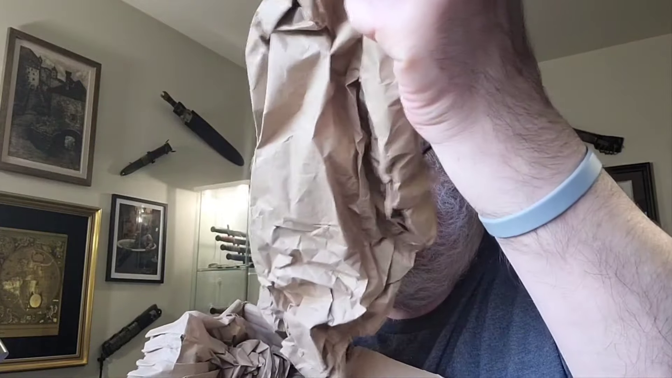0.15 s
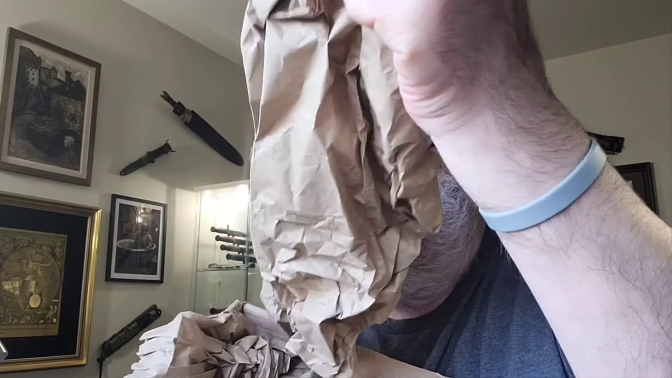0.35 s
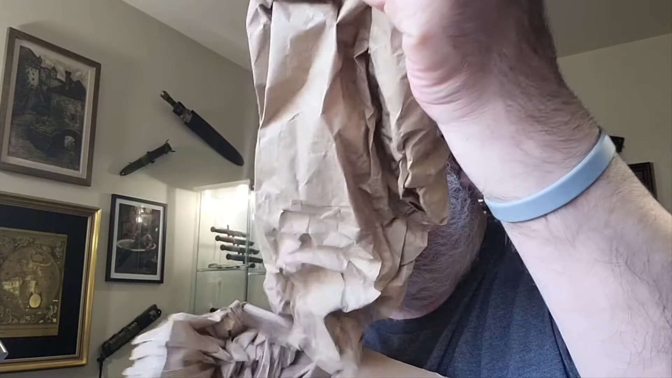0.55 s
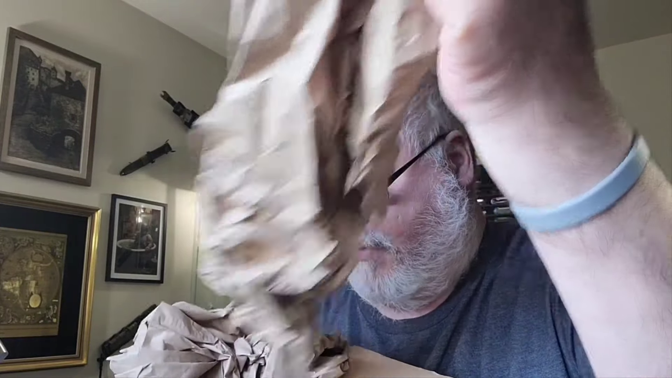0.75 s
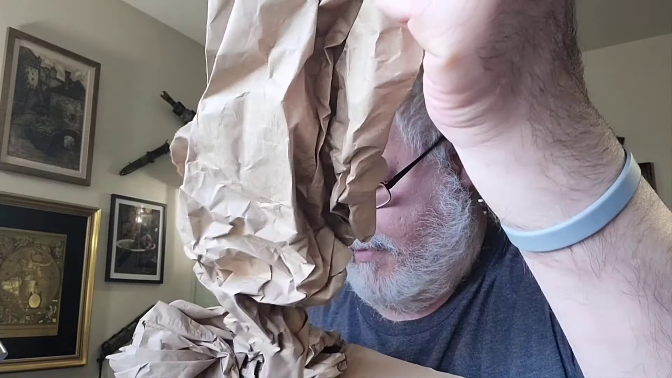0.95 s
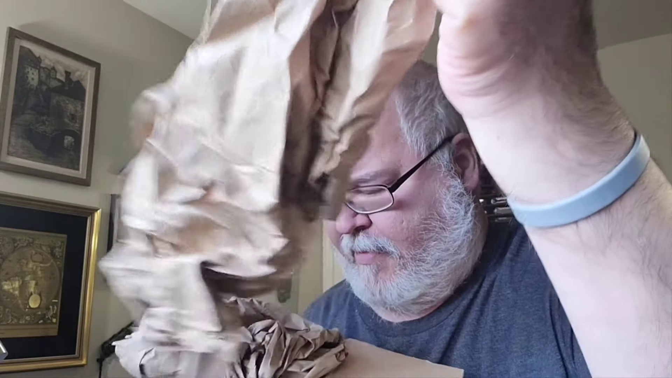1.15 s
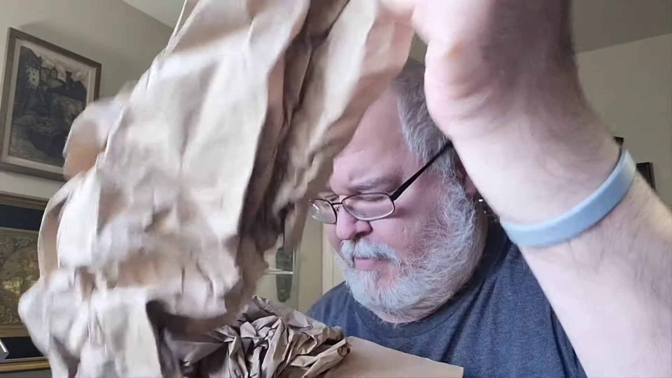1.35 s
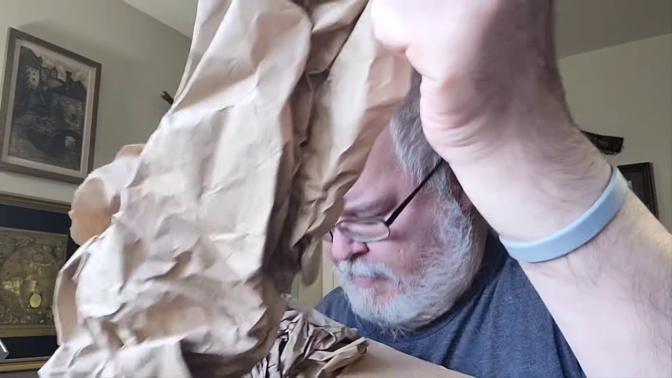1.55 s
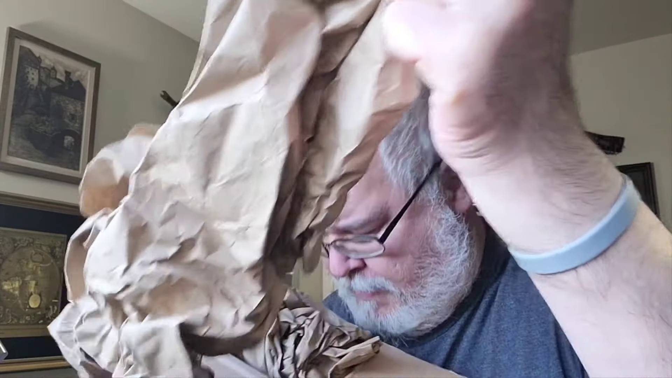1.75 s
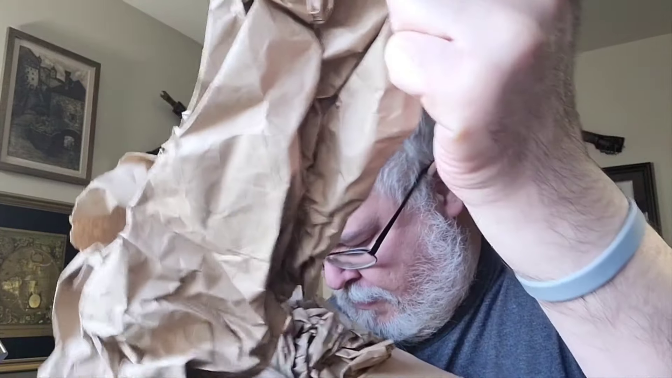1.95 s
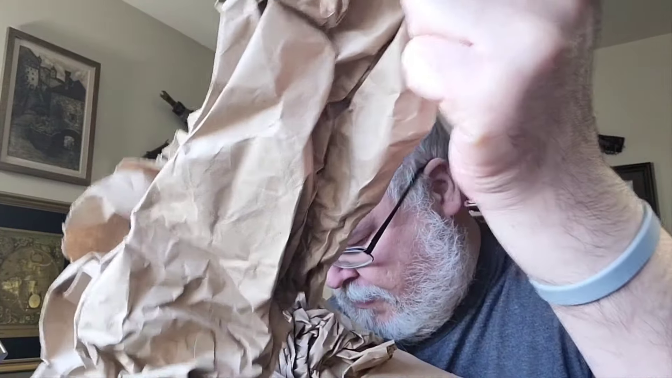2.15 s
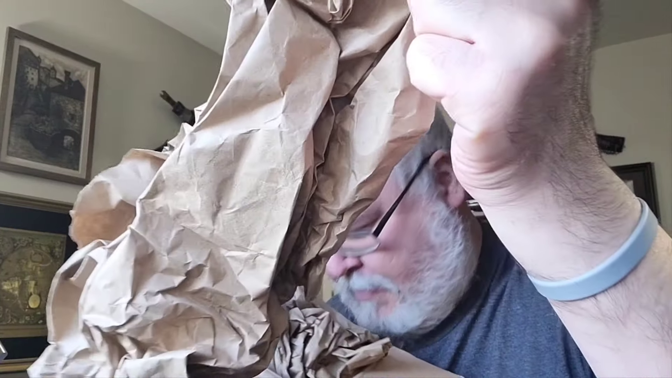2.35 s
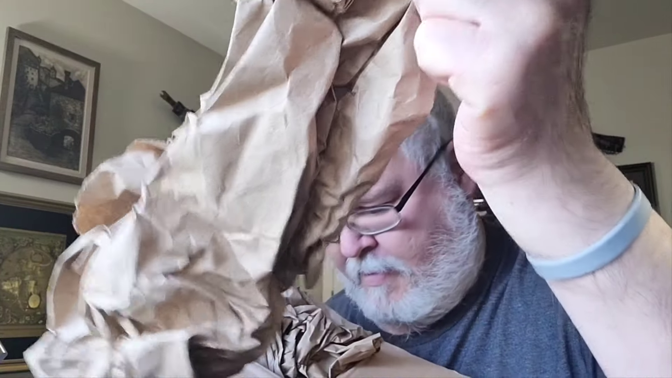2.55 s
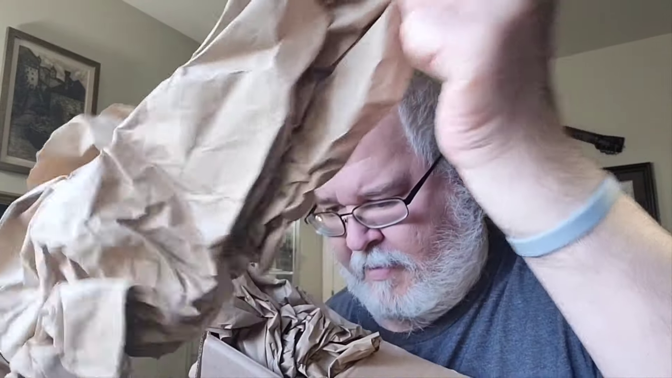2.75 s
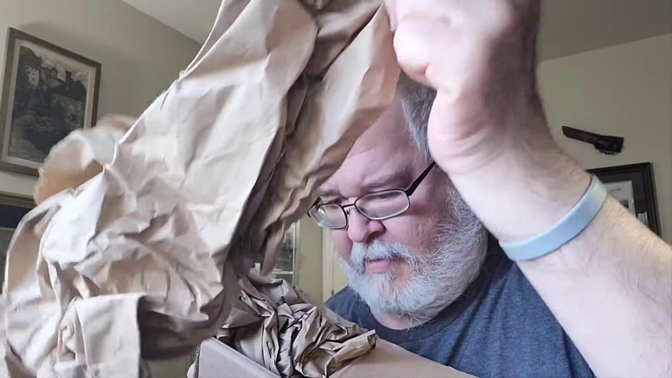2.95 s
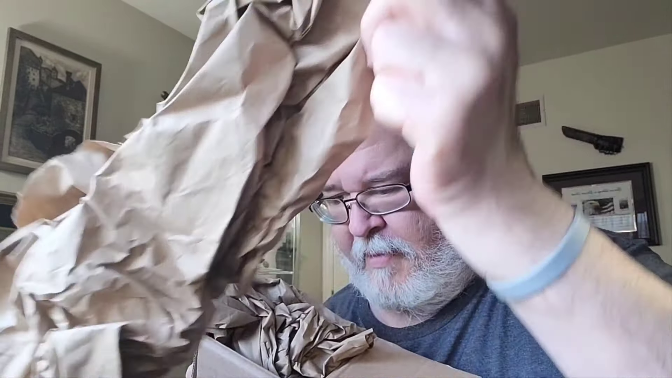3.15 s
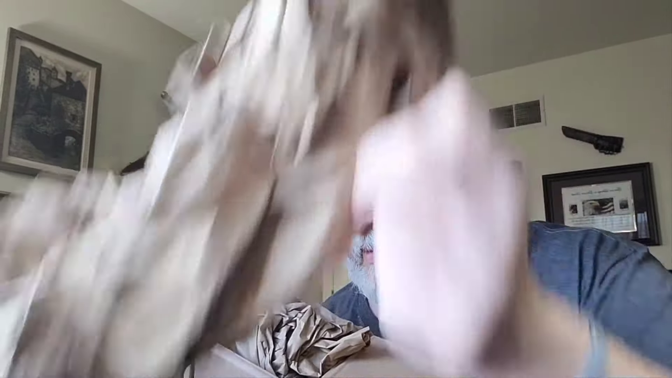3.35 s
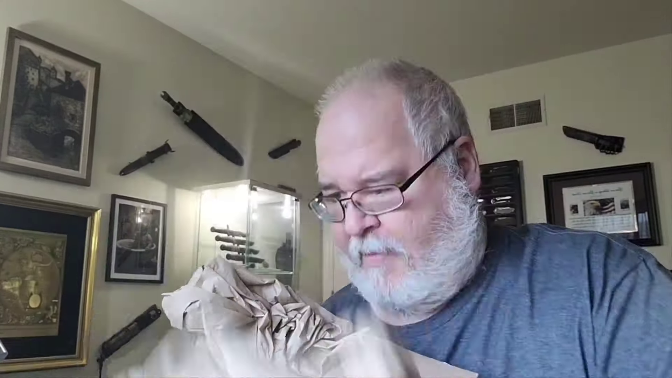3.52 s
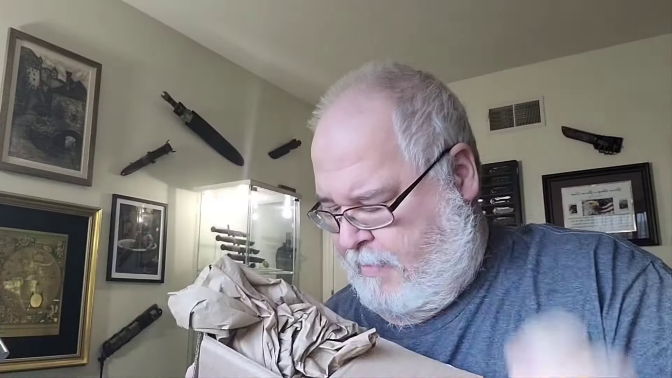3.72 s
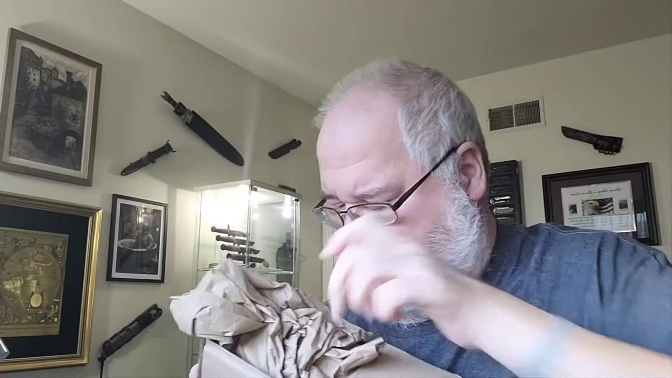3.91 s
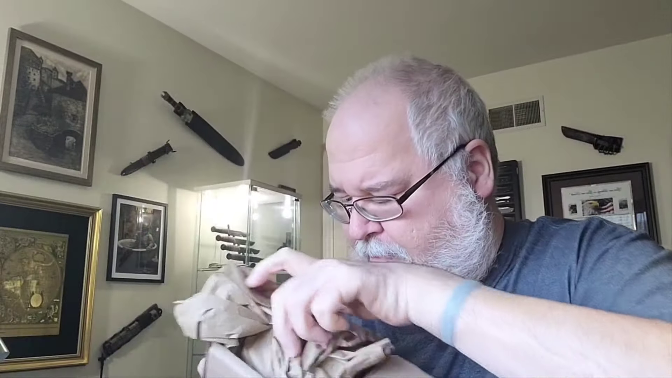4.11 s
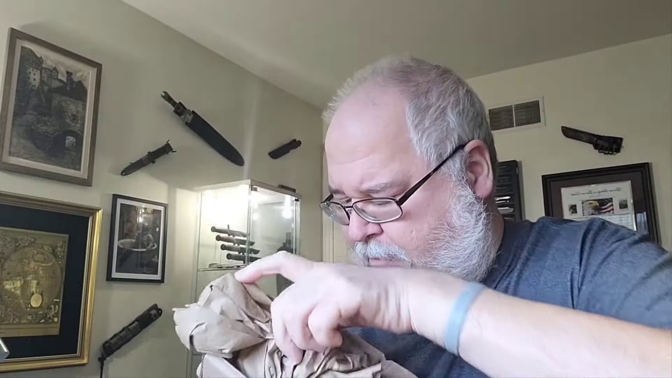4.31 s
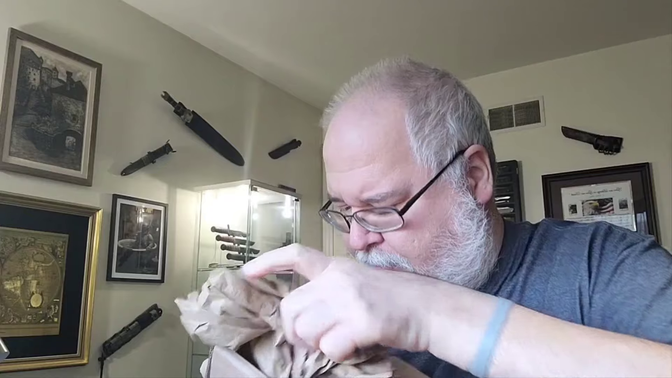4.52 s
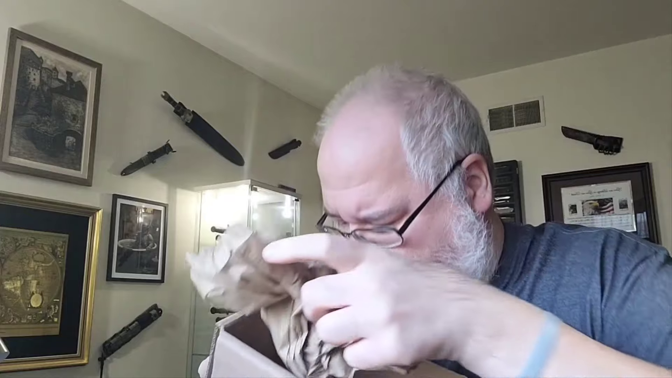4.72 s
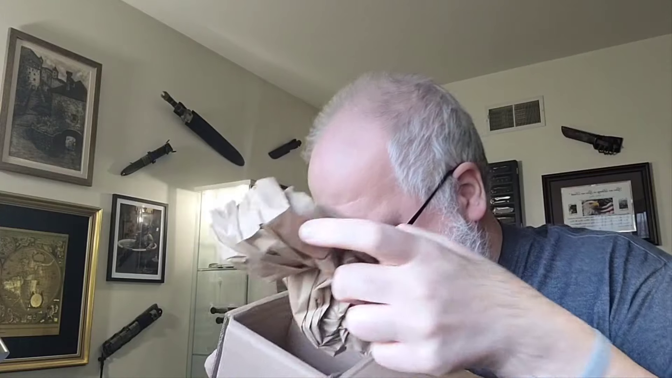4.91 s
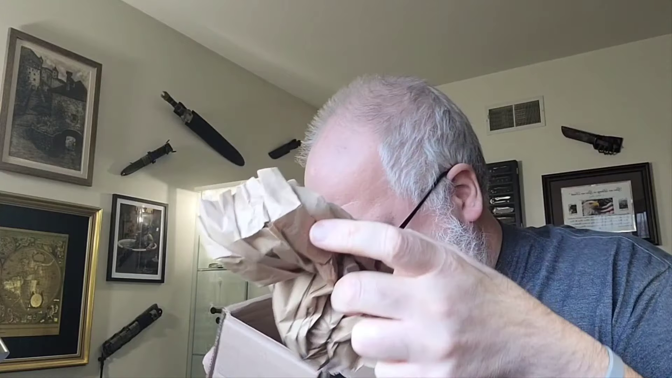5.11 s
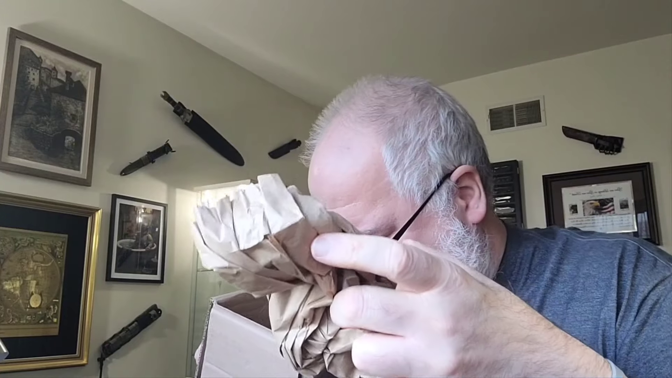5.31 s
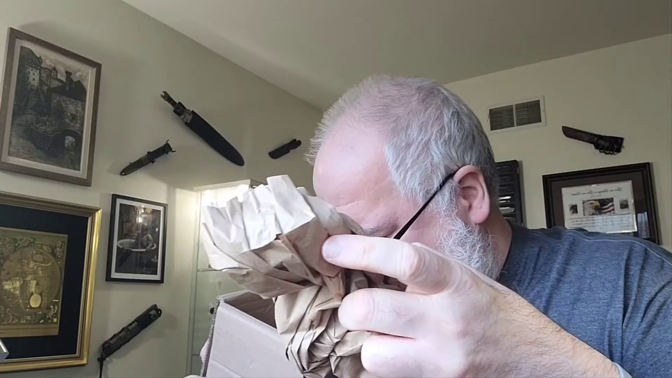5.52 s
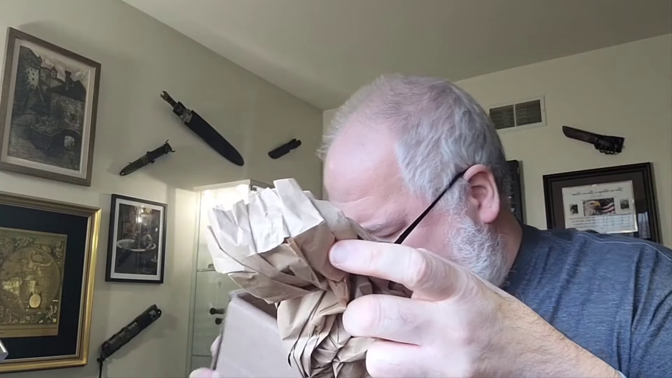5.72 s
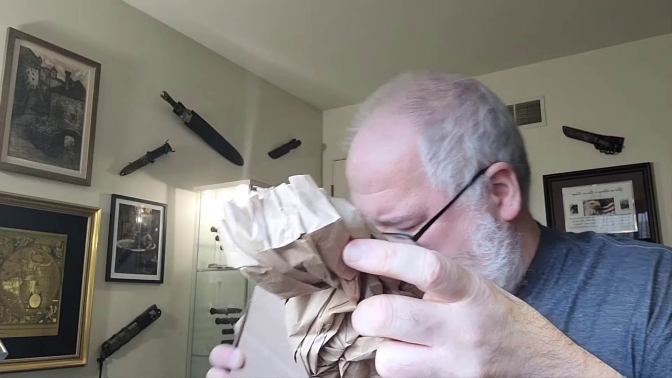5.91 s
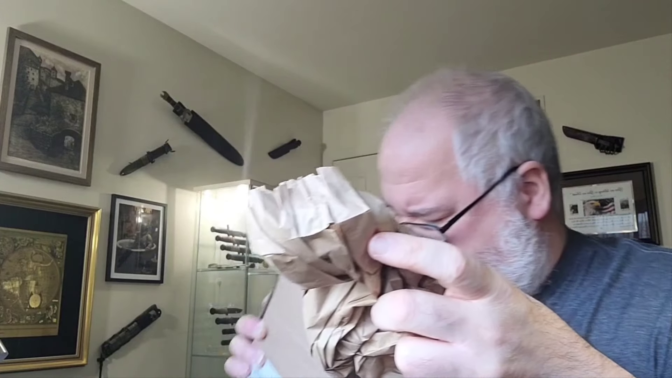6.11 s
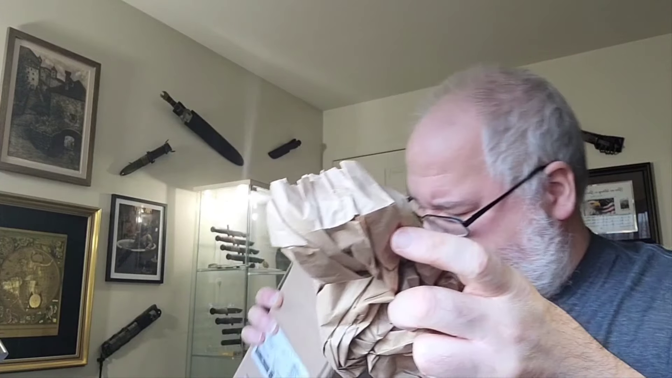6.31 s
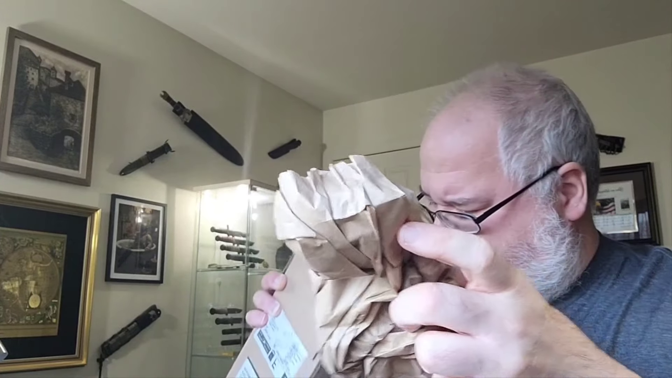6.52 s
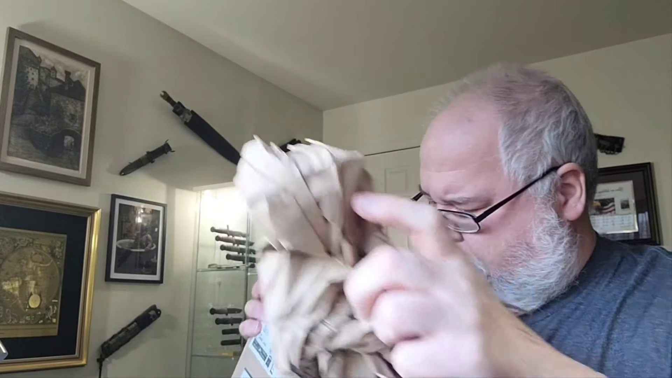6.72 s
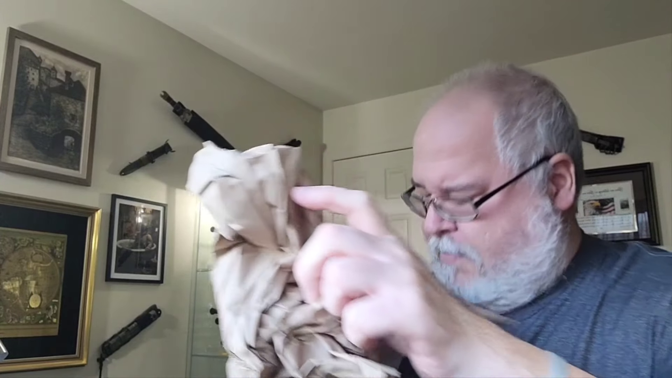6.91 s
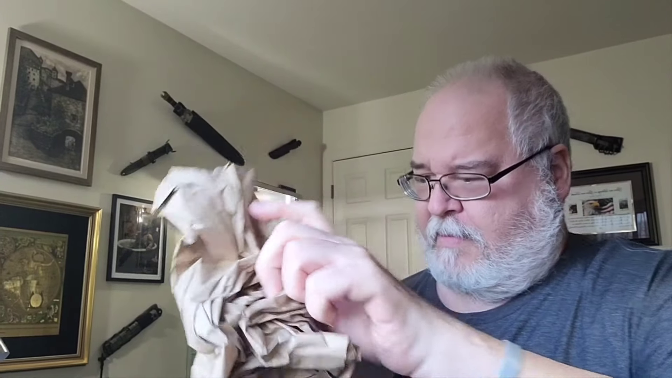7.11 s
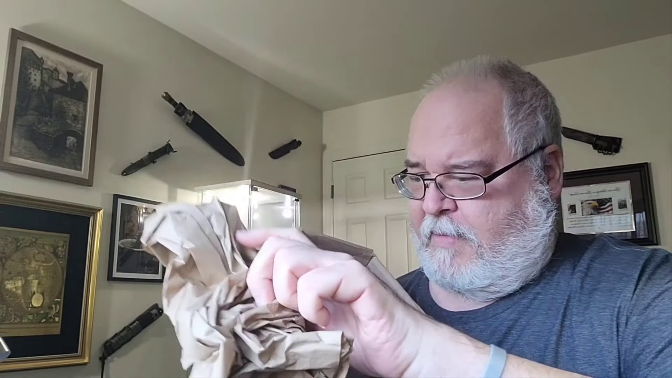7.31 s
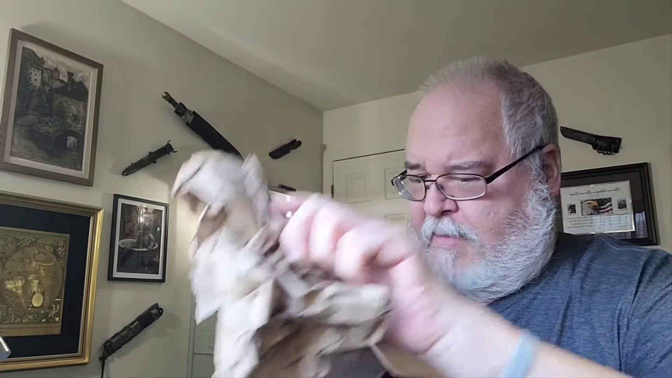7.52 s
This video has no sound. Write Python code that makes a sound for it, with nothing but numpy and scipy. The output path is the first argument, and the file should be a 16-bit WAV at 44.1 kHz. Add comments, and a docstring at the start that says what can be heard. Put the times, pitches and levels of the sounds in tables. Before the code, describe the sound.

Stiff brown packing paper crackles and crunches loudly out of a cardboard box, swishes gently, drops with a puff, then is grabbed in sharp snaps.

```python
"""Crumpled packing paper is pulled from a cardboard box close to a phone in a small room, over a low hum.
First the paper rubs in dense tiny slips, box walls knock, creases snap and ring their facets, and folds
crunch and thump the box. Held aloft it swishes more gently, until it drops at 3.6 s with a puff of air and
is grabbed again in loud snaps from 4.2 s. Sparse rustles follow, and the box scrapes the wad near 6.7 s.
Two microphone ports hear the paper with a small lag."""
import sys
import numpy as np
from scipy import signal
from scipy.fft import rfft, irfft
from scipy.io import wavfile

SR = 44100
rng = np.random.default_rng(int(sys.argv[2]) if len(sys.argv) > 2 else 0)


def generate_wav(signal):
    """Clip the signal to [-1, 1] and save it as 16-bit WAV at the path in sys.argv[1]."""
    frames = np.transpose(np.atleast_2d(signal))
    scaled = np.clip(frames, -1, 1) * 32767
    pcm = np.round(scaled).astype(np.int16)
    wavfile.write(sys.argv[1], SR, pcm)


N = 333396
TIME = np.arange(N) / SR
PORT_LAG = 3.92  # samples; basic delay of the paper at the right port
TYPICAL_RUB_DB = -43  # reference level for swishes and snaps

# place of the paper: time_s, lift (0 in the box .. 1 held aloft)
PAPER_LIFT = [(0, 0.49), (.75, 0.32), (1.1, 0.9), (3.45, 0.96), (3.6, 0.93), (4.1, 0.012), (7.56, 0.084)]
# colour of the cardboard walls: frequency_hz, level_db
BOX_COLOUR = [(21, -36), (35, -6), (85, -1.5), (130, -3.5), (239, -6), (300, -3.5), (390, -1), (510, -5),
              (854, -15), (1170, -9.5), (1560, -28.5), (2640, -120)]
# colour of paper held in the open: frequency_hz, level_db
ALOFT_COLOUR = [(290, -34.5), (500, 3.5), (843, -6.5), (1080, 3), (1300, -3), (2070, 1), (2430, -7),
                (2850, -4.5), (4800, -5.5), (5380, -1), (5950, -6.5), (7300, -10), (8700, -19),
                (10800, -18), (16000, -24.5)]


def undb(db):
    """Decibels to gain."""
    return 10 ** (np.asarray(db) / 20)


def unit(x):
    """Scale to rms 1."""
    return x / np.sqrt(np.mean(x ** 2) + 1e-20)


def band(x, hz, kind, order=2):
    """Butterworth low- or high-pass."""
    sections = signal.butter(order, min(hz, .45 * SR), kind, fs=SR, output="sos")
    return signal.sosfilt(sections, x)


def convolve(x, response):
    """Run a sound through an impulse response, keeping its length."""
    return signal.oaconvolve(np.atleast_2d(x), np.atleast_2d(response), axes=-1)[:, :x.shape[-1]]


def colour(x, points, size=4096):
    """Minimum-phase filter of unit energy with the given (Hz, dB) outline."""
    hz, db = np.transpose(points)
    outline = np.interp(np.log(np.fft.rfftfreq(size, 1 / SR) + 1), np.log(hz), db)
    # folding the cepstrum onto positive times makes the response causal
    cepstrum = irfft(np.log(undb(outline)))
    cepstrum[1:size // 2] *= 2
    cepstrum[size // 2 + 1:] = 0
    response = irfft(np.exp(rfft(cepstrum)))
    return convolve(x, response / np.linalg.norm(response))


def fade(t, t60):
    """Exponential decay that is 60 dB down after t60 seconds."""
    return np.exp(-np.log(1000) * t / max(t60, 1e-4))


def walk(rate):
    """Random wander through independent normal values, rate of them per second."""
    steps = rng.standard_normal(2048)
    return np.interp(TIME * rate, np.arange(len(steps)), steps)


def slips(n, rate, spread_db):
    """Sparse impulses of rms 1, rate per second; spread_db sets how unequal their sizes are."""
    size_db = spread_db * np.minimum(rng.exponential(size=n), 4)
    struck = rng.random(n) < rate / SR
    return unit(struck * rng.choice([-1, 1], n) * undb(size_db))


def ports(x, lag, size=32):
    """Left and right port; the right one hears the sound lag samples later."""
    taps = np.arange(size) - size // 4
    return convolve(x, np.sinc([taps, taps - lag]))


def add(out, s, sound):
    """Mix a sound in at time s."""
    i = max(int(s * SR), 0)
    out[:, i:i + sound.shape[1]] += sound[:, :N - i]


def radiate(x, aloft_lag=2.15, aloft_db=-3.0):
    """Crossfade from the hollow box to open paper held aloft, which reaches the right port later."""
    # colour of paper inside the box: frequency_hz, level_db
    box_paper_colour = [(290, -29.5), (500, -7), (795, -11), (868, -28.5), (1180, -4.5), (1400, 2),
                        (1600, -0.5), (1900, -7.5), (2260, -11.5), (3060, -11.5), (3650, -14), (5160, -6),
                        (7000, -11), (8700, -29.5), (10400, -20), (16000, -25)]
    lift = np.clip(np.interp(TIME, *np.transpose(PAPER_LIFT)), 0, 1)
    boxed = colour(ports(x, lag=0), box_paper_colour)
    free = colour(ports(x, aloft_lag), ALOFT_COLOUR) * undb(aloft_db)
    return np.sqrt(1 - lift) * boxed + np.sqrt(lift) * free


def sheet(rate, spread_db, patchy_db, facet_t60, facet_db, lag_spread, size=1024):
    """One patch of paper after another takes up the slipping; each has its own force, facets and direction."""
    out, contact, t = np.zeros((2, N)), slips(N + size, rate, spread_db), TIME[:size]
    grip = np.sin(np.pi * np.arange(size) / size)
    for i in range(0, N, size // 2):
        force, place = rng.uniform(-1, 1, 2)
        facets = rng.standard_normal(size) * fade(t, facet_t60)
        facets *= undb(facet_db) / np.linalg.norm(facets)
        facets[0] += 1  # the direct slip
        patch = contact[None, i:i + size] * grip * undb(patchy_db * force)
        response = ports(facets, PORT_LAG + lag_spread * place)
        add(out, i / SR, signal.fftconvolve(patch, response, axes=-1))
    return unit(radiate(out))


def room_tone(level_db=-67.5, waver_db=1.0, apart_hz=600):
    """A low, slightly wavering hum of coloured noise with faint hiss; its treble differs between the ports."""
    # colour of the room air: frequency_hz, level_db
    air_colour = [(25, -10.5), (53, -7), (125, 5.5), (212, -7), (480, -11.5), (911, -26.5), (1440, -28.5),
                  (2610, -47.5), (6210, -34.5), (7710, -53.5), (16000, -44.5)]
    mid, side = rng.standard_normal((2, N))
    side = band(side, apart_hz, "high", order=1)
    air = unit(colour(np.array([mid + side, mid - side]), air_colour))
    hum = band(air, 250, "low", order=1)
    return undb(level_db) * (air + hum * (undb(waver_db * walk(9)) - 1))


def handling(slide_treble_db=-6, slide_drum_db=-1.5, typical_drum_db=-54.5, drum_follow=0.73):
    """Swishes ride on steady sliding; sums powers into rubbing level, treble share and drumming level in dB."""
    # steady sliding, drumming before its trim: time_s, rubbing_db, drumming_db
    sliding = [(0.0, -63.5, -68), (0.2, -52, -46), (0.33, -64, -57.5), (0.47, -64.5, -50.5),
               (0.64, -80, -54), (0.72, -50, -54.5), (0.8, -51, -53.5), (1.05, -64, -59.5),
               (1.502, -55, -61), (1.64, -71.5, -66), (2.15, -67.5, -63), (2.421, -81, -68),
               (2.69, -71, -67), (2.82, -54, -58), (3.17, -79.5, -65.5), (3.53, -54.5, -58.5),
               (3.78, -55.5, -48.5), (4.0, -68.5, -68.5), (4.14, -70, -60.5), (4.22, -56, -55),
               (4.36, -43.5, -51.5), (4.65, -45, -54.5), (4.92, -70.5, -58.5), (5.1, -77.5, -77),
               (5.301, -65.5, -58), (5.471, -83.5, -76), (6.45, -90, -81), (6.74, -77.5, -69.5),
               (6.92, -83, -73.5), (7.28, -83, -78.5), (7.35, -68, -69), (7.56, -73, -78)]
    # swishes, each one tug or swing of the paper: start_s, hold_s, rubbing_db, treble_share_db
    strokes = [(0.0, 0.001, -30, -4.5), (0.122, 0.18, -40, -3.5), (0.374, 0.097, -47.5, -6),
               (0.428, 0.1, -43.5, -6), (0.564, 0.037, -50.5, -6.5), (0.682, 0.077, -35.5, -2),
               (0.838, 0.059, -43, 0), (0.993, 0.01, -42, -1.5), (1.103, 0.037, -46, 5),
               (1.289, 0.033, -47, -6.5), (1.705, 0.033, -54.5, -13), (1.771, 0.033, -54, -4.5),
               (1.972, 0.021, -59, -4), (2.085, 0.031, -64, -9), (2.258, 0.0069, -60.5, -18),
               (2.339, 0.026, -64, -17), (2.497, 0.043, -65.5, -7.5), (2.724, 0.029, -58, -9),
               (2.794, 0.04, -51, -3), (2.87, 0.084, -60.5, -3), (3.03, 0.0052, -47, -4),
               (3.116, 0.0029, -52, -0.5), (3.185, 0.18, -69, -1.5), (3.32, 0.17, -61.5, -8.5),
               (3.468, 0.012, -42.5, -8.5), (3.58, 0.044, -35.5, -1.5), (3.654, 0.036, -42, -3),
               (3.717, 0.061, -41.5, 7), (4.089, 0.0074, -57.5, -9), (4.18, 0.038, -38.5, -0.5),
               (4.287, 0.059, -38, -0.5), (4.429, 0.034, -39.5, -2.5), (4.669, 0.12, -50.5, 0),
               (4.828, 0.026, -52.5, -2), (5.138, 0.037, -65.5, -3.5), (5.386, 0.011, -66, 2),
               (5.671, 0.01, -64, -6), (6.751, 0.059, -69, -3.5), (6.811, 0.014, -60, -6),
               (6.969, 0.023, -63, -6.5), (7.114, 0.022, -65.5, -7), (7.233, 0.015, -70, -16.5),
               (7.312, 0.0083, -58.5, -5), (7.415, 0.088, -65, -1.5)]
    # edge slopes at the typical hold; shorter flicks have steeper edges, by the power abruptness
    swell_db_per_s, sag_db_per_s, release_db_per_s = 643.5, 9.5, 381.5
    typical_hold_s, abruptness = 0.38, 0.23

    s, slide_db, drum_db = np.transpose(sliding)
    rub = undb(np.interp(TIME, s, slide_db)) ** 2
    drum = undb(np.interp(TIME, s, drum_db) + slide_drum_db) ** 2
    treble = rub * undb(slide_treble_db) ** 2
    for start, hold, db, treble_db in strokes:
        age = TIME - start
        haste = (typical_hold_s / hold) ** abruptness
        swell_db = swell_db_per_s * np.maximum(-age, 0)
        release_db = release_db_per_s * np.maximum(age - hold, 0)
        stroke_db = db - sag_db_per_s * np.maximum(age, 0) - haste * (swell_db + release_db)
        heard = stroke_db > -110
        stroke_db = stroke_db[heard]
        rub[heard] += undb(stroke_db) ** 2
        treble[heard] += undb(stroke_db + treble_db) ** 2
        # drumming grows more slowly than rubbing, in dB per dB
        stroke_drum_db = typical_drum_db + drum_follow * (stroke_db - TYPICAL_RUB_DB)
        drum[heard] += undb(stroke_drum_db) ** 2
    return 10 * np.log10([rub, treble / rub, drum])


def rubbing(level_db, treble_db, split_hz=3300, dull_db=-3, bright_db=-4):
    """Paper slides on paper in dense slips, balanced between dull and bright by the treble share."""
    grains = sheet(rate=4500, spread_db=2.5, patchy_db=0.8, facet_t60=0.014, facet_db=1.5, lag_spread=6.7)
    dull = undb(dull_db) * unit(band(grains, split_hz, "low", order=4))
    bright = undb(bright_db) * unit(band(grains, split_hz, "high", order=4))
    share = np.clip(undb(treble_db) ** 2, 0, .92)
    return undb(level_db) * (np.sqrt(1 - share) * dull + np.sqrt(share) * bright)


def ticks(level_db, tick_db=-6.0, limit_db=-56):
    """Lone little creases pop with the rubbing up to a limit, so they stand out in gentle movement."""
    pops = sheet(rate=110, spread_db=2.5, patchy_db=2, facet_t60=.006, facet_db=-2, lag_spread=2.5)
    return pops * undb(np.minimum(level_db + tick_db, limit_db))


def drumming(level_db, gain_db=0.5, apart_hz=650, lurch_db=2.5, lurch_rate=16):
    """Handling drums in uneven lurches on the sheet and cardboard walls; the ports differ mainly above the bass."""
    mid, side = slips(N, rate=990, spread_db=3.5), slips(N, rate=1900, spread_db=-2.0)
    side = .5 * band(side, apart_hz, "high", order=1)
    beats = unit(colour(ports(np.array([mid + side, mid - side]), lag=12.0), BOX_COLOUR))
    return beats * undb(level_db + gain_db + lurch_db * walk(lurch_rate))


def knocks(gain_db=-7, ring_t60=0.076, push_t60=0.042):
    """The wad and fingers knock cardboard: a soft noise push and a wall ringing for a few cycles."""
    # dull knocks, levels before gain: start_s, level_db, wall_pitch_hz
    wall_knocks = [(0.004, -32.5, 167), (1.16, -38.5, 152), (1.258, -43, 200), (1.325, -42, 115),
                   (1.42, -47.5, 148), (1.559, -38.5, 125), (1.773, -39, 100), (2.137, -42.5, 238),
                   (2.201, -39, 140), (2.55, -46.5, 161), (2.982, -46, 388), (3.034, -41, 118),
                   (3.46, -43, 285), (4.165, -45, 144), (4.319, -27, 84), (4.455, -25.5, 408),
                   (4.616, -34.5, 379), (4.895, -36.5, 116), (5.205, -47.5, 318), (5.6, -50.5, 146.3),
                   (5.76, -46.5, 100), (6.886, -50, 97)]
    pushes, rings, t = np.zeros((1, N)), np.zeros((1, N)), TIME[None, :SR // 8]
    for s, db, hz in wall_knocks:
        push = .5 * rng.standard_normal(t.shape) * fade(t, push_t60)
        ring = np.sin(2 * np.pi * hz * t) * fade(t, ring_t60) * (1 - fade(t, 0.004))
        add(pushes, s, undb(db) * push)
        add(rings, s, undb(db) * ring)
    return undb(gain_db) * ports(colour(pushes, BOX_COLOUR) + rings, PORT_LAG)


def snap_crack(age, db, treble, length):
    """A crease creaks, flips and runs out in a ragged train of tiny cracks; small creases settle after it."""
    t, flipped, lead = np.maximum(age, 0), age >= 0, SR // 50
    running = fade(t, length) + undb(1) * fade(t, 0.0028)  # extra force just after the flip
    creak = undb(-19) * fade(np.abs(age), 0.028)
    run = np.where(flipped, running * (1 - fade(t, 0.00028)), creak)
    crack = slips(len(t), rate=3500, spread_db=1.5) * run
    crack *= undb(6.0) / np.linalg.norm(crack)
    tears = crack[lead:].copy()
    crack[lead] += 1  # the flip itself
    crack += undb(-30) * slips(len(t), rate=1900, spread_db=0.5) * fade(t, 0.24) * flipped
    top_hz = 14000 * 2 ** ((db - TYPICAL_RUB_DB) / 22)  # gentle snaps are duller: an octave per 22 dB
    crack = band(colour(crack, ALOFT_COLOUR)[0], top_hz, "low")
    dull, bright = unit(band(crack, 3300, "low")), unit(band(crack, 3300, "high", order=3))
    return np.sqrt(1 - treble) * dull + np.sqrt(treble) * undb(-2) * bright, tears


def snap_ring(t, hz, ringing, tears, ring_cycles=19, free_cycles=55, twin_spread=0.04):
    """A buckled facet rings at its pitch and two close side modes, shaken on by the running crease."""
    twins_hz = hz * (1 + twin_spread * np.sqrt(1 - ringing) * rng.standard_normal((2, 1)))
    modes = np.sin(2 * np.pi * hz * t) + undb(-6) * np.sin(2 * np.pi * twins_hz * t).sum(0)
    cycles = ring_cycles + free_cycles * ringing ** 4  # a freer facet rings on for more cycles
    ring = unit(modes * fade(t, cycles / hz) * (1 - fade(t, 7 / hz)))
    shaken = unit(signal.fftconvolve(ring, tears)[:len(t)])
    return unit(ring + undb(-5) * shaken)


def snaps(boxed_lag=3.38, aloft_lag=4.4, crack_treble=0.4, treble_per_octave=0.22):
    """Single creases snap: a crack and a ringing facet share the energy; higher facets crack more brightly."""
    # snapping creases: flip_s, level_db, facet_pitch_hz, ringing_share (0-1), run_t60_s
    creases = [(0.0352, -43, 1620, 0.77, .02), (0.121, -30, 4740, 0.74, 0.016),
               (0.166, -22.5, 5280, 0.73, 0.029), (0.23, -33, 1570, 0.8, 0.059),
               (0.238, -25.5, 4900, 0.55, 0.03), (0.284, -38.5, 4650, 0.7, 0.034),
               (0.6816, -18.5, 4440, 0.97, 0.041), (0.6957, -12.5, 4980, 0.72, 0.033),
               (0.698, -20.5, 6560, 0.44, 0.063), (1.0018, -31, 2660, 0.46, 0.026),
               (1.235, -63, 6050, .1, .012), (1.2901, -43.5, 1140, 0.24, .025),
               (1.307, -53, 3200, .3, 0.017), (1.3208, -40.5, 3660, 0.45, 0.018),
               (1.3915, -61, 6000, 0.7, 0.025), (1.4228, -54, 2110, 0.7, 0.017),
               (1.437, -44.5, 2140, 0.56, 0.027), (1.465, -57, 5300, 0.2, .02),
               (1.509, -57, 3400, 0.4, .02), (1.543, -55, 4200, 0.25, .02), (1.686, -46, 2700, 0.75, 0.011),
               (1.7127, -51, 1840, 0.54, .025), (1.7714, -44.5, 926, 0.44, 0.058),
               (1.795, -50, 1040, 0.8, .03), (1.9911, -49.5, 1056, 0.9, 0.042),
               (2.015, -47.5, 1080, 0.6, .03), (2.127, -61, 4970, 0.14, 0.021),
               (2.203, -54.5, 1500, 0.6, 0.012), (2.2443, -51, 3580, 0.3, .012),
               (2.35, -54.5, 1090, 0.84, 0.063), (2.502, -69, 3000, 0, .03),
               (2.738, -38.5, 2040, 0.99, .04), (2.8331, -46.5, 5130, 0.58, .05),
               (3.027, -51, 5070, 0.1, 0.094), (3.122, -60, 3140, 1, 0.059),
               (3.3135, -48, 2710, 0.78, 0.035), (3.337, -67, 2400, 0.5, .025),
               (3.4663, -50, 3680, 0.4, 0.025), (3.768, -34, 5300, 0, 0.065),
               (3.869, -41.5, 3030, 0.53, .04), (3.935, -56, 6100, 0.6, .025),
               (4.0432, -49.5, 1510, 0.04, 0.09), (4.137, -49.5, 5060, 0, 0.026),
               (4.198, -42, 5200, 0.7, .012), (4.293, -25.5, 5330, 0.46, 0.01),
               (4.335, -29, 4400, 0.64, 0.031), (4.377, -41, 2380, 0.4, .03),
               (4.4005, -36.5, 1510, 0.6, 0.02), (4.4257, -25.5, 4430, 0.37, 0.036),
               (4.4574, -35, 4200, 0.6, 0.02), (4.489, -31.5, 5130, 0.74, .04),
               (4.524, -34, 5930, 0.4, 0.022), (4.609, -22, 5200, 0.75, 0.045),
               (4.6174, -33, 1693, 0.9, .03), (4.6354, -31, 6670, 0.15, .012),
               (4.66, -39, 5280, 0.6, 0.023), (4.75, -36.5, 5060, 0.37, .025),
               (5.1697, -55.5, 1350, 0.44, 0.033), (5.394, -56.5, 5460, 0.4, 0.045),
               (5.478, -50, 4740, 0, 0.019), (5.668, -69, 1500, 0.22, 0.096),
               (5.763, -55.5, 3930, 0.27, 0.055), (6.0, -65, 4270, 0.03, 0.066),
               (6.14, -66.5, 1365, 0.6, .06), (6.8213, -56, 4146, 0.32, 0.035),
               (7.0497, -58.5, 5750, 0.8, .004), (7.117, -53, 1570, 0.64, 0.026),
               (7.3445, -65, 5400, 0.8, .02), (7.372, -58, 1490, 0.5, .025),
               (7.4825, -49, 5400, 0.9, 0.024)]
    out, lead = np.zeros((2, N)), SR // 50  # samples of creaking before the flip
    age = TIME[:SR // 9] - lead / SR
    t = np.maximum(age, 0)
    burst = np.sqrt(.004 * SR / len(t))  # levels refer to a 4 ms burst
    for s, db, hz, ringing, length in creases:
        treble = crack_treble + treble_per_octave * np.log2(hz / 1000)
        treble, ringing = np.clip([treble, ringing], 0, 1)
        crack, tears = snap_crack(age, db, treble, length)
        ring = snap_ring(t, hz, ringing, tears)
        snap = np.sqrt(1 - ringing) * crack + np.sqrt(ringing) * ring
        lift = np.interp(s, *np.transpose(PAPER_LIFT))
        add(out, s - lead / SR, ports(undb(db) * burst * snap, boxed_lag + aloft_lag * lift))
    return out


def crunches(crunch_db=-19, thump_db=-1, rise_s=0.0064):
    """A fold gives way in an avalanche of creases and shoves the box; returns creasing and thumps."""
    # collapsing folds, levels before gain: start_s, crease_level_db, box_thump_db, length_s
    folds = [(0.153, -23.5, -41, 0.053), (0.23, -18, -33, 0.014), (0.675, -14.5, -28, 0.034),
             (0.72, -17.5, -30, 0.032), (3.565, -16, -51, 0.032), (3.589, -20.5, -41.5, 0.019),
             (3.702, -29.5, -56, 0.075), (4.316, -23, -29.5, 0.022), (4.407, -36, -46, 0.11)]
    # colour of the thumped box: frequency_hz, level_db
    thump_colour = [(18, -31.5), (65, -4), (125, -11.5), (165, -0.5), (257, -13.5), (394, -7.5), (474, -15),
                    (687, -17), (900, -24), (1980, -120)]
    avalanche, shove = np.zeros((2, 1, N))
    t = TIME[None, :SR // 3]
    for s, db, box_db, length in folds:
        swell = (1 - np.exp(-t / rise_s)) * np.exp(-(t / max(length, rise_s)) ** 2)
        add(avalanche, s, undb(db + crunch_db) * swell)
        add(shove, s, undb(box_db + thump_db) * swell)
    creases = sheet(rate=2200, spread_db=2.5, patchy_db=2, facet_t60=.008, facet_db=-3, lag_spread=1.5)
    thumps = unit(colour(ports(rng.standard_normal(N), PORT_LAG), thump_colour))
    return avalanche * creases + shove * thumps


def crisp(x, top_db, top_hz=9000):
    """Add high treble to the crunches, for crisper creasing."""
    return x + undb(top_db) * band(x, top_hz, "high")


def draught(drop_s=3.585, level_db=-41, rise_s=0.0033, t60=0.34, top_hz=70):
    """The sheet falling past the phone pushes a soft puff of low noise at both ports."""
    age = np.maximum(TIME - drop_s, 0)
    air = unit(band(rng.standard_normal(N), top_hz, "low", order=3))
    return undb(level_db) * air * (1 - np.exp(-age / rise_s)) * fade(age, t60)


def scrape(gain_db=-2, rate=1800, spread_db=-0.5, lag=3.7, catch_db=4, catch_rate=55):
    """The tilted box sticks and slips along the wad in fine grains, catching on folds until it slips free."""
    # scraping force, before gain and catching: time_s, level_db
    scrape_levels = [(6.44, -87), (6.55, -78.5), (6.65, -71.5), (6.7, -77), (6.76, -66.5), (6.83, -64),
                     (6.87, -88)]
    # colour of cardboard on paper: frequency_hz, level_db
    scrape_colour = [(700, -29), (1350, 10), (1900, -13.5), (2650, -10), (3300, -1), (4400, 4.5),
                     (5200, -9), (6800, -9), (8700, -21), (16000, -29)]
    s, db = np.transpose(scrape_levels)
    grains = unit(colour(ports(slips(N, rate, spread_db), lag), scrape_colour))
    level_db = np.interp(TIME, s, db) + gain_db + catch_db * walk(catch_rate)
    return grains * undb(level_db) * (TIME > s[0]) * (TIME < s[-1])


def room(x, wet_db=-10, early_db=-9, early_t60=0.019, t60_low=0.25, t60_high=0.15, split_hz=2500, shared_hz=450):
    """Table, box and hands reflect early; the walls add a short tail; both ports share the reflected bass."""
    t = TIME[:SR // 2]
    near, far = rng.standard_normal((2, 2, len(t)))
    early = near * fade(t, early_t60) * (t > .001)
    low_tail = band(far, split_hz, "low") * fade(t, t60_low)
    high_tail = band(far, split_hz, "high") * fade(t, t60_high)
    tail = (low_tail - high_tail) * (t > .007)
    early *= undb(early_db) / np.linalg.norm(early[0])
    tail *= undb(wet_db) / np.linalg.norm(tail[0])
    left, right = early + tail
    response = np.array([left, right + band(left - right, shared_hz, "low", order=1)])
    return x + convolve(x[0], response)


def room_mode(x, hz=161, q=9, gain=0.54):
    """The small room booms at one low standing wave."""
    return x + gain * signal.lfilter(*signal.iirpeak(hz, q, fs=SR), x)


def scene(left_db=0.5, snap_room_share=0.72):
    """Paper and cardboard in the room, a little to the left, with the puff of air and the hum."""
    level_db, treble_db, drum_db = handling()
    paper = rubbing(level_db, treble_db) + ticks(level_db) + crisp(crunches(), top_db=8.0)
    cardboard = drumming(drum_db) + knocks() + scrape()
    cracks = snaps()
    # creases snap close to the phone, so less of them comes by way of the room
    heard = room(paper + cardboard + snap_room_share * cracks) + (1 - snap_room_share) * cracks
    heard = heard * undb([[left_db / 2], [-left_db / 2]])
    return room_mode(heard + draught() + room_tone())


def record(dry, port_hz=5300, port_q=0.5, port_gain=0.45,
           whistle_hz=5420, whistle_q=18, whistle_gain=0.29, low_cut_hz=34, top_hz=16200):
    """The ports resonate broadly and at one narrow peak; the phone thins rumble, rounds peaks and cuts the top."""
    heard = dry + port_gain * signal.lfilter(*signal.iirpeak(port_hz, port_q, fs=SR), dry)
    heard = heard + whistle_gain * signal.lfilter(*signal.iirpeak(whistle_hz, whistle_q, fs=SR), heard)
    rounded = .85 * np.tanh(band(heard, low_cut_hz, "high") / .85)
    return signal.sosfilt(signal.ellip(10, .2, 80, top_hz, fs=SR, output="sos"), rounded)


dry = scene()
out = record(dry)
generate_wav(out)
```